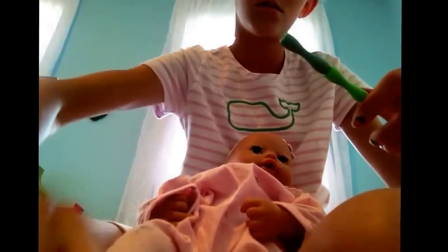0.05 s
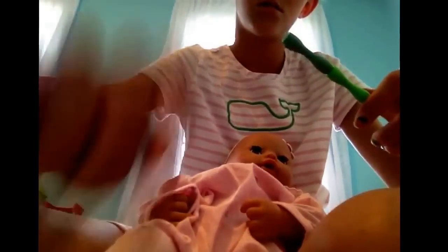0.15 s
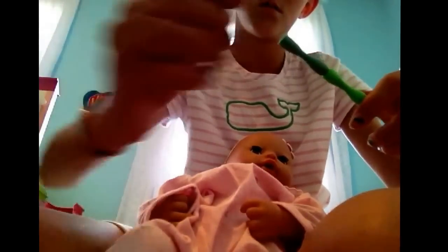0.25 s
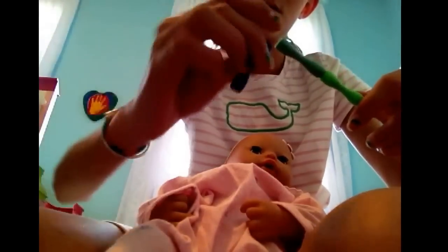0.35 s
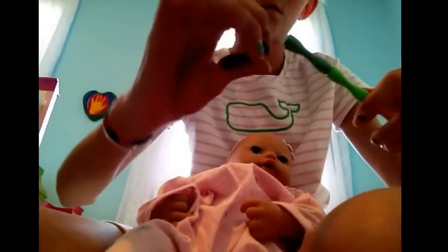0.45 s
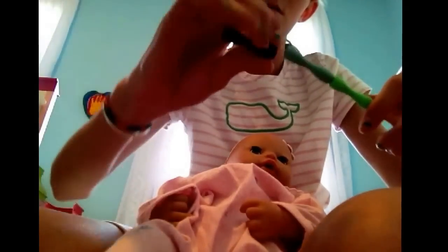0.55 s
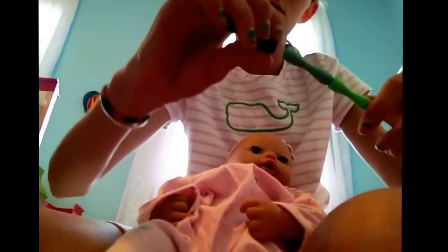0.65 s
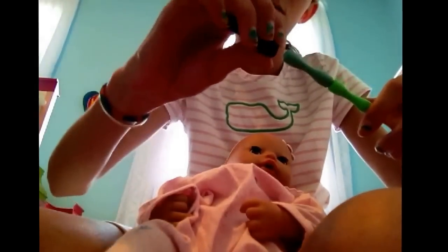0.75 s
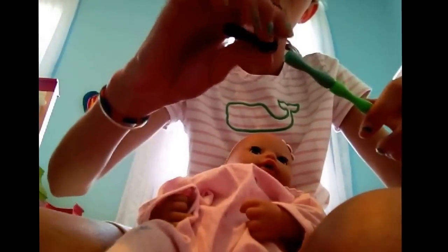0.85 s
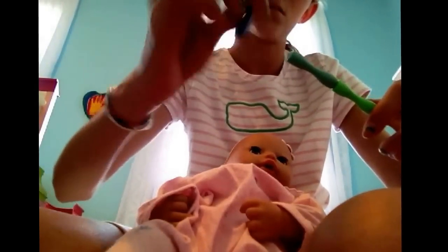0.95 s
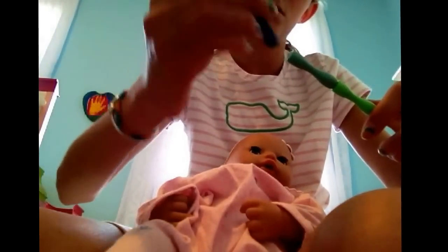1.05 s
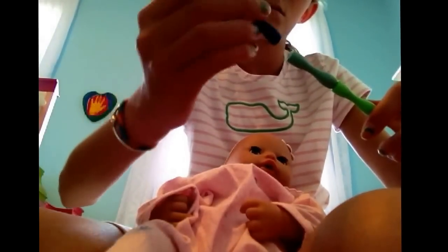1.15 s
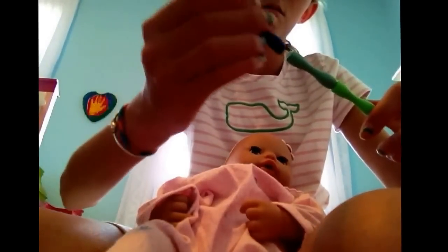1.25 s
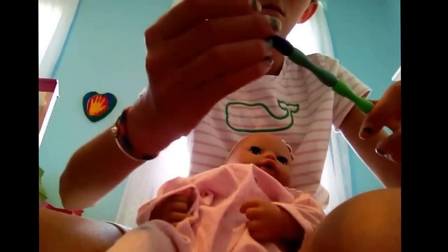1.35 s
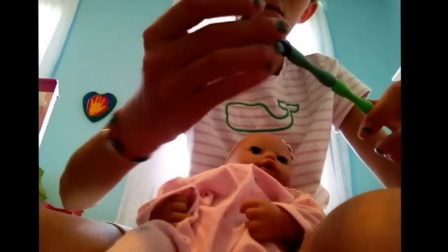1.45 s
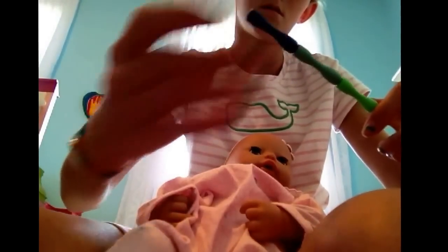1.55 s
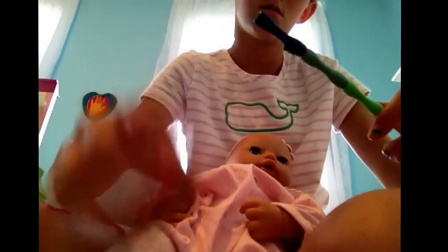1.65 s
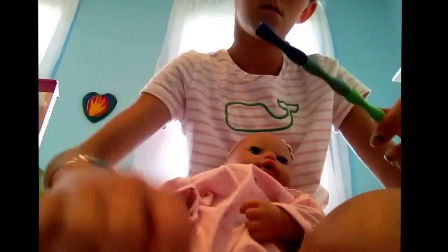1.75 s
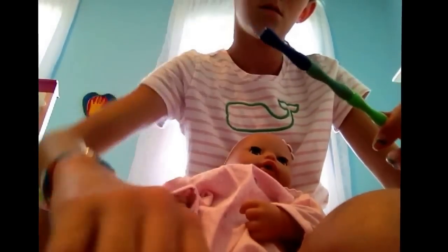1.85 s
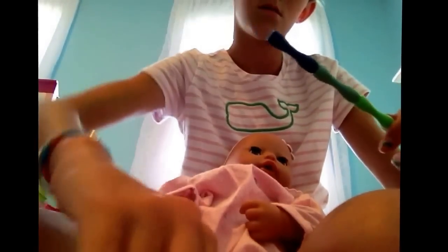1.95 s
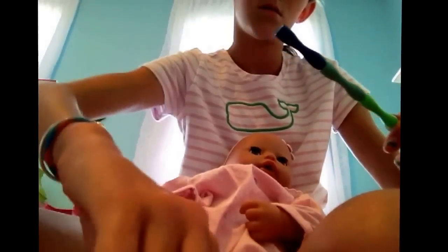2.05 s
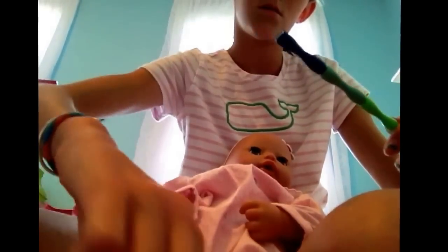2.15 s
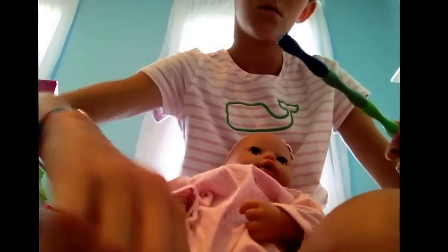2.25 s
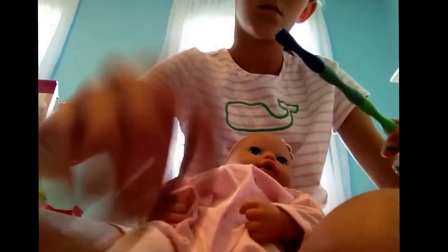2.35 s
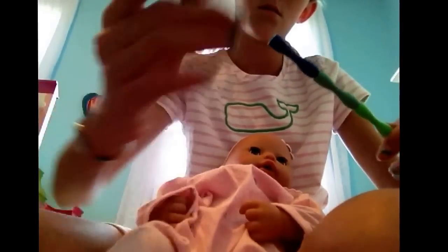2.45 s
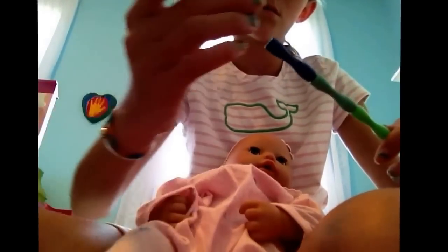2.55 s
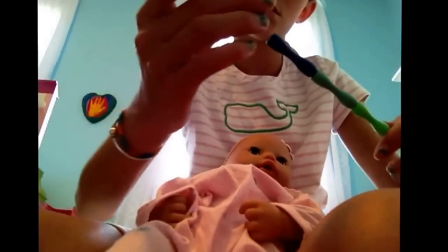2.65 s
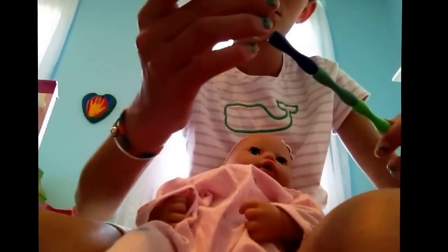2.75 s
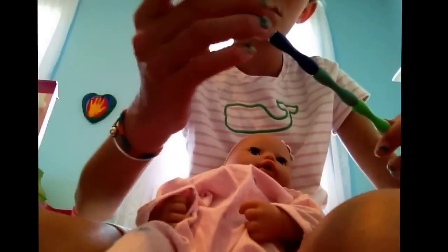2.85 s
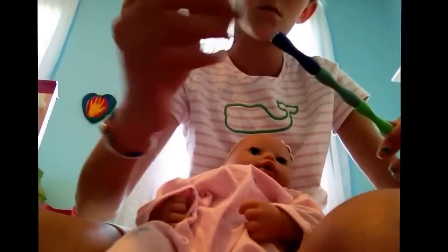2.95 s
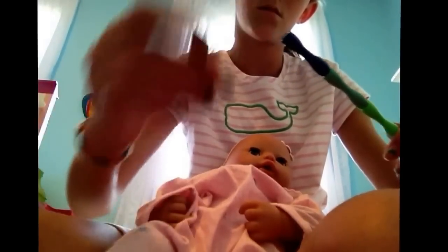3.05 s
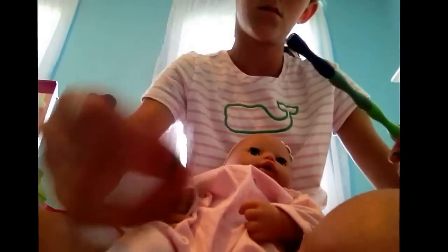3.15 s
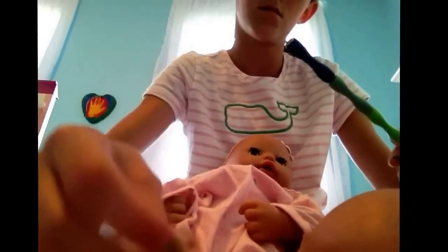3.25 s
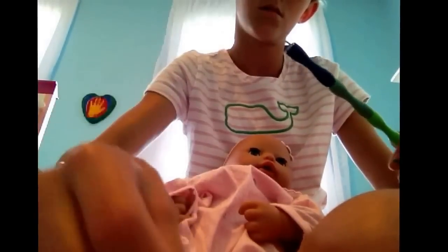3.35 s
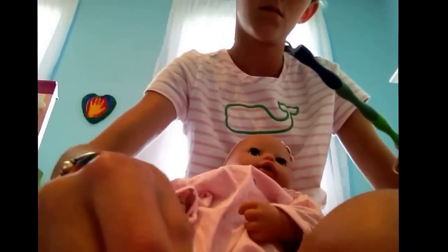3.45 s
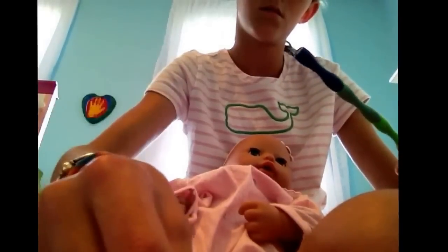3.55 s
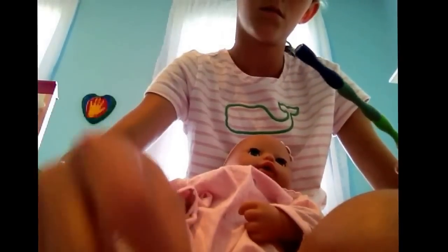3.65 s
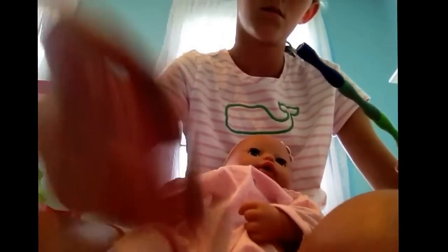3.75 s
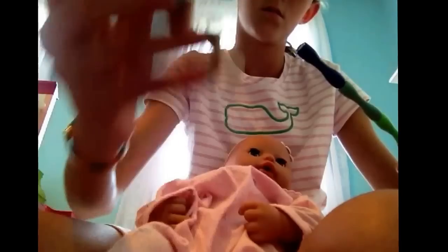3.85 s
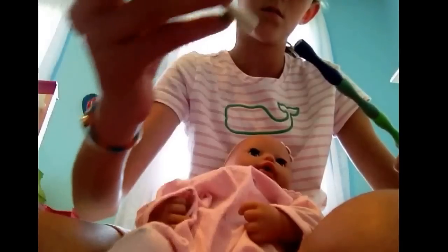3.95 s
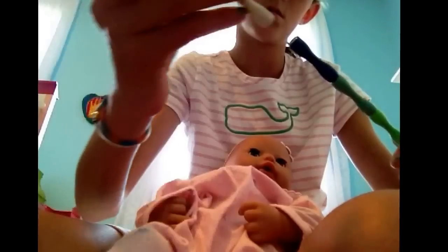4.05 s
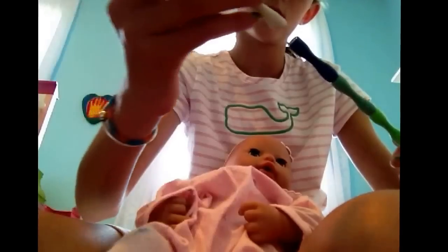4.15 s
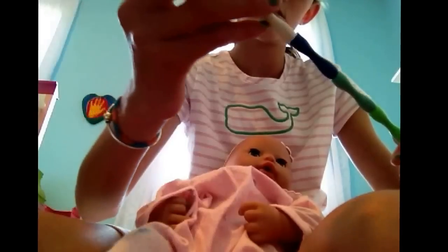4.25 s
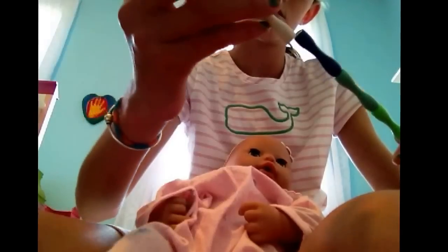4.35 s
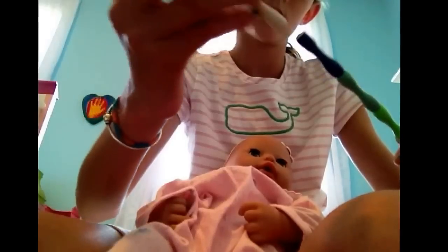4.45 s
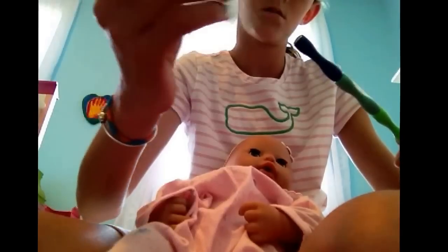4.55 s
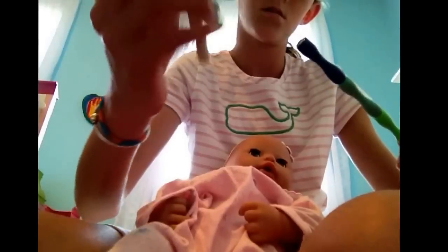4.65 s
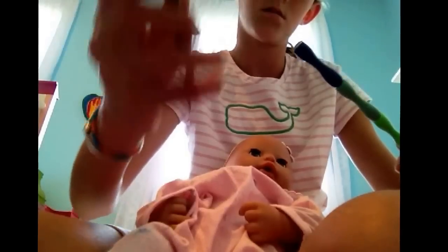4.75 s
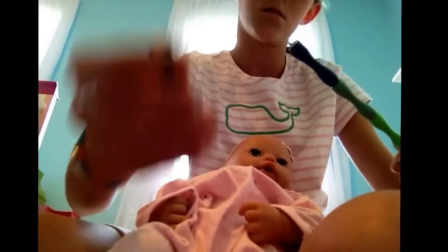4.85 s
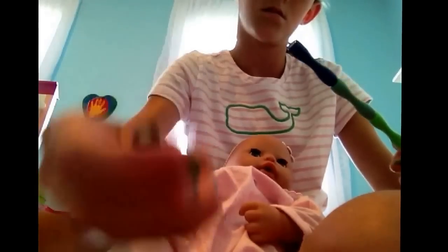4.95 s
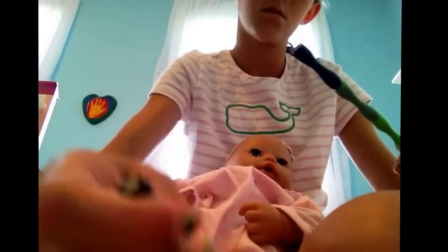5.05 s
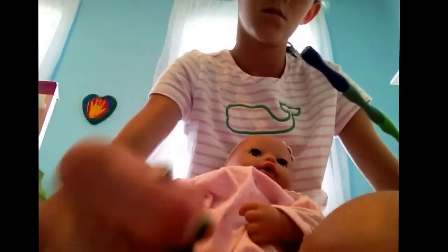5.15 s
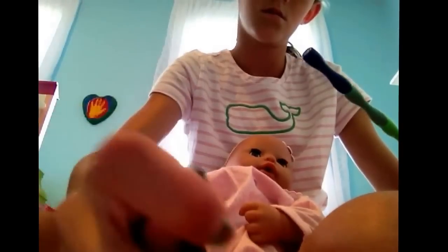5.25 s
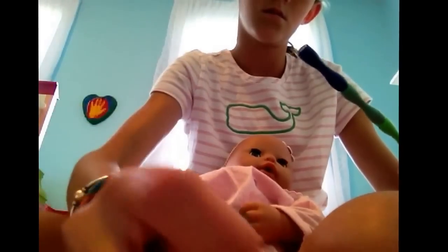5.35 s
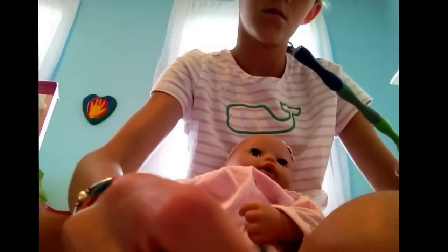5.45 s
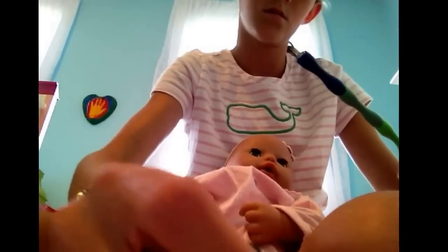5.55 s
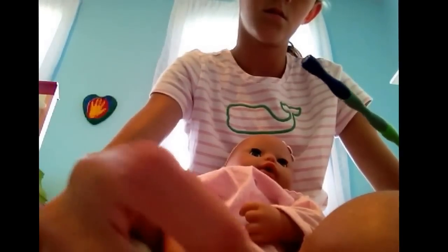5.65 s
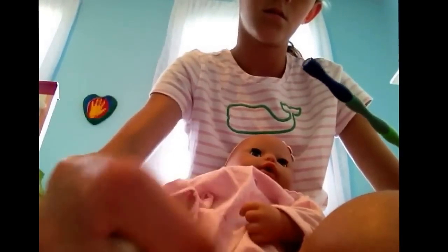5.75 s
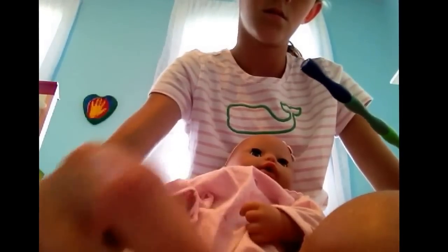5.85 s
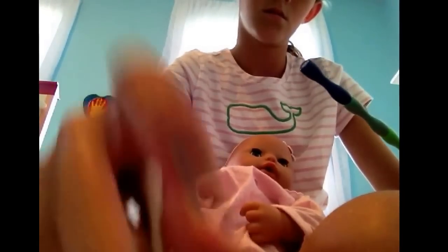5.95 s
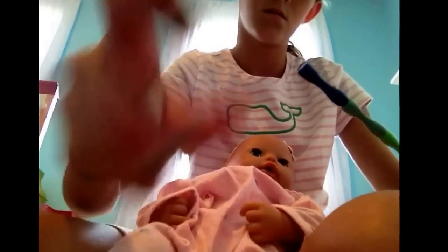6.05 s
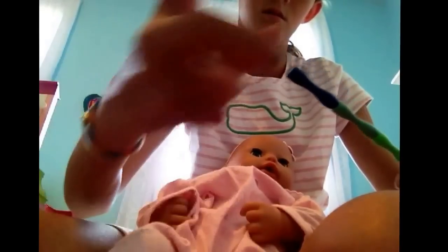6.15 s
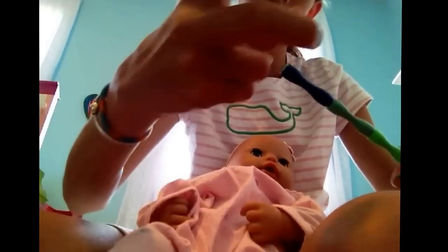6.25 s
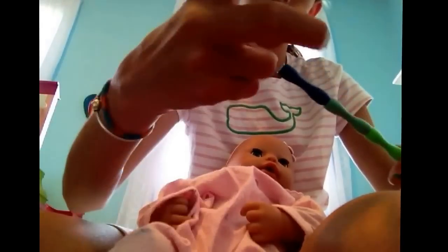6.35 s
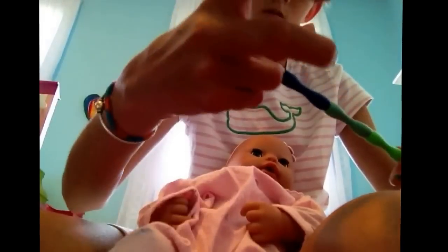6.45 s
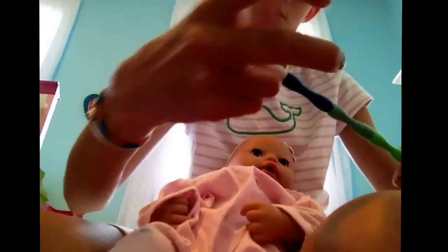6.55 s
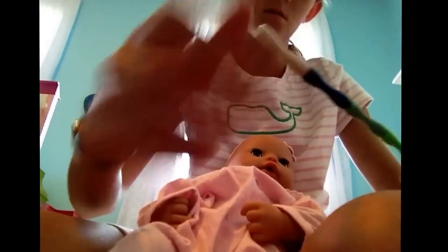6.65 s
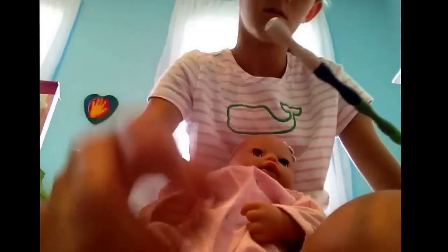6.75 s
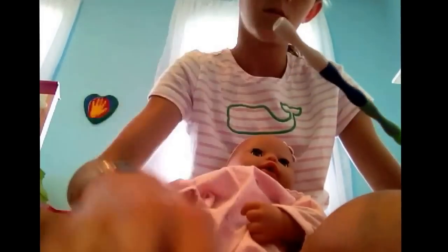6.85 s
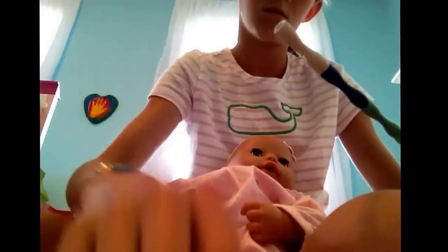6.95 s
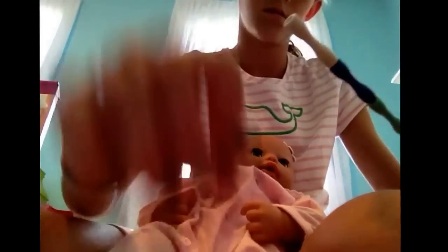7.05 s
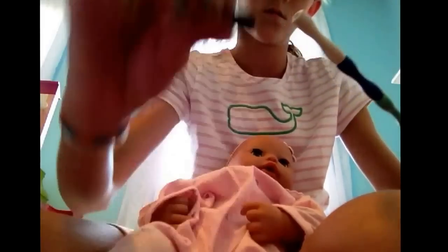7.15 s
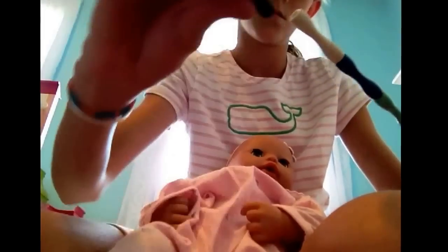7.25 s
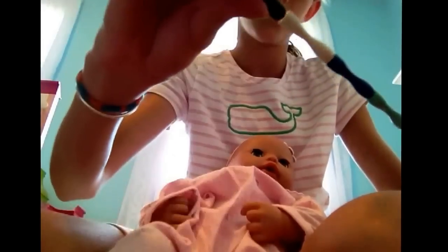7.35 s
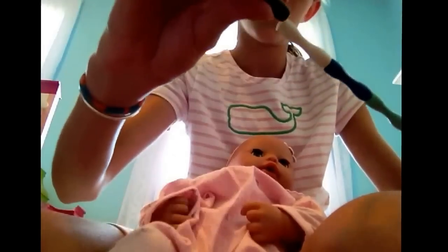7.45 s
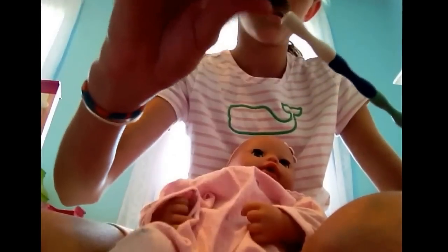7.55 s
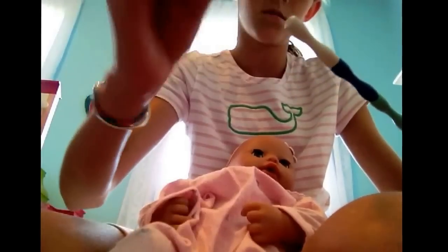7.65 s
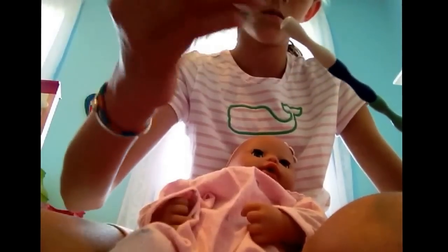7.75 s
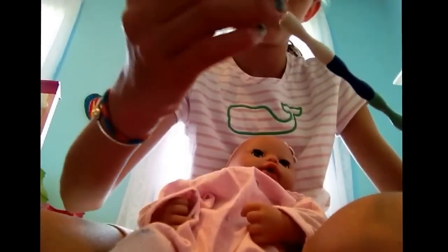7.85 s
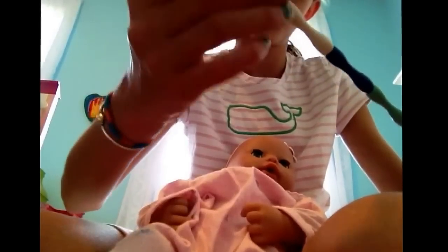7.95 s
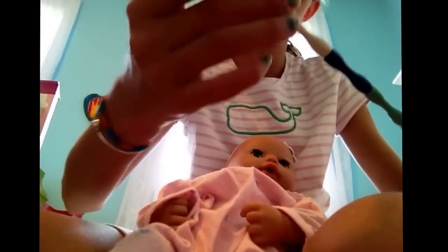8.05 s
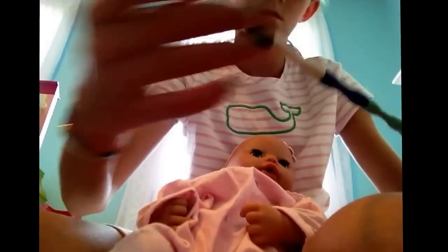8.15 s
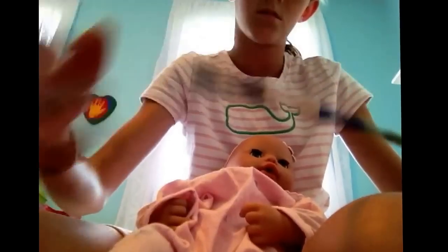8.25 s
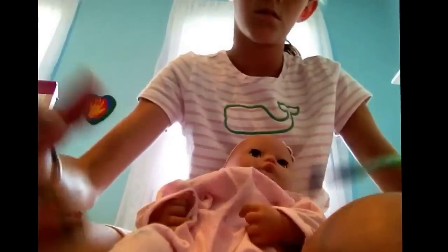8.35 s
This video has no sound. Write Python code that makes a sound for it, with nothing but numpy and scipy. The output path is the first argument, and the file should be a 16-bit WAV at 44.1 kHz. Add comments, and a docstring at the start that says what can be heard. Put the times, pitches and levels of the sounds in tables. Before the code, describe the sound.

Small magnetic rods snap together four times with crisp, high metallic clacks close by, over very faint fabric brushing, low room murmur and thin hiss.

```python
"""A small, quiet bedroom, close to the microphone: a hand brushes cloth, then clothes shift softly.
Magnetic toy rods snap together at 1.3, 3.4, 6.4 and 7.9 s: a touch, a rebound and a few milliseconds of chatter
drive a very high metal ring, a lower plastic rod and a hollow knock, then the room answers.
Between the snaps come more brushing and shifting, made of shaped noise; a loose rod pings faintly at 6.8 s.
Noise murmur and hiss run throughout, and all levels dip after a loud snap and creep back."""
import sys
import numpy as np
from scipy import signal
from scipy.fft import rfft, irfft
from scipy.io import wavfile
from scipy.ndimage import uniform_filter1d

SR = 44100
rng = np.random.default_rng(int(sys.argv[2]) if len(sys.argv) > 2 else 0)


def master(y):
    """Save y as 16-bit WAV."""
    cut = np.clip(np.atleast_2d(y).T, -1, 1)
    pcm = np.round(cut * 32767)  # scale
    wavfile.write(sys.argv[1], SR, pcm.astype(np.int16))


N = 370358

# magnets meeting: (time [s], crack [dB], metal ring [dB], rod clack [dB], rod ping [dB], hollow knock [dB],
#                   knock pitch [Hz], rebound delay [s], rebound [dB], chatter t60 [s], room [dB])
MAGNET_SNAPS = [(1.286, -1.5, 4.5, -21, -28, -20.5, 1895, .0021, -4, 0.012, -12.5),
                (3.4345, -4.7, 2.5, -3, -5.5, -18.5, 1789, .0012, -9.5, .016, -16),
                (6.4259, -3, 10, -18, -30, -23, 1410, .0016, -12, .017, -14.5),
                (7.9236, -4.5, -2.5, -17, -19, -22.5, 970, .0012, -1, 0.019, -13.5)]
# a loose rod tapped lightly: (time [s], ping [dB], crack [dB], metal ring [dB])
LOOSE_ROD_TAPS = [(6.845, -30, -42, -36)]
# ringing metal end of a rod: (frequency [Hz], level [dB], t60 [s])
METAL_MODES = [(12200, -15, .005), (12800, -2, .007), (13450, 0, .008), (14100, -2, .006),
               (14700, -7, .005)]
# quickly damped modes of the plastic rod: (frequency [Hz], level [dB], t60 [s])
ROD_MODES = [(2670, -3.5, 0.0022), (3400, -0.5, .007), (3800, -4, 0.0055), (4300, -3, 0.006),
             (4500, -6.5, 0.0098), (5050, -4.5, 0.014)]
# close modes that ring on when a rod is held loosely: (frequency [Hz], level [dB], t60 [s])
PING_MODES = [(4220, -1, .02), (4330, 0, .014), (4270, -12, .22)]
# spectrum of the bare contact: (frequency [Hz], level [dB per Hz])
CRACK_SPECTRUM = [(100, -33.5), (500, -19.5), (1200, -18.5), (3000, -9), (4800, -2), (5800, -5), (7000, 1),
                  (8400, 2.5), (10000, -2), (11500, -2.5), (13500, -2), (16000, -7)]
# spectrum of the hollow plastic shell: (multiple of the knock pitch [ratio], level [dB per Hz])
SHELL_SPECTRUM = [(.06, -42.5), (.25, -16), (.5, -11), (.8, -0.5), (1.3, -3), (2, -1), (3.2, -18.5),
                  (9, -35.5)]
BASS_CUT_HZ = 270

# strong reflections from floor, wall and ceiling: (delay [s], level against the diffuse tail [dB])
ROOM_ECHOES = [(.0039, -5), (.0143, -13.5), (.0168, -15.5), (.0259, -13.5)]
# reverberation time of the bedroom: (frequency [Hz], t60 [s])
ROOM_DECAY = [(300, .2), (1000, 0.12), (2500, .14), (4300, .17), (8000, 0.13), (13500, 0.155)]
# how much the walls and furniture send back: (frequency [Hz], level [dB])
ROOM_TONE = [(300, 0.5), (1000, 2), (2500, -3), (4300, -1), (8000, 1.5), (13500, -1.5)]

# a hand brushes along cloth and comes to rest:
# (time of the touch [s], lead-in [s], rustle [dB], touch [dB])
HAND_REACHES = [(.065, 0.034, -66.5, -76), (1.885, 0.092, -68.5, -76), (2.0, 0.032, -66.5, -76),
                (5.905, .055, -64.5, -62.5), (6.932, 0.069, -64.5, -60)]
RUB_RELEASE_S, TOUCH_HALF_WIDTH_S, TOUCH_HZ = .015, .009, 290
# arms and knees shift softly: (time of the peak [s], half width [s], level [dB], centre [Hz])
LIMB_SHIFTS = [(.75, 0.051, -61.5, 273), (2.53, .019, -76, 60), (3.08, .014, -64.5, 180),
               (5.74, .018, -73, 75), (7.485, 0.055, -60.5, 175)]
SLEEVE_DB = -19   # sleeve rustle, relative to the shift that drags it
# spectrum of rustling cloth: (frequency [Hz], level [dB per Hz])
RUSTLE_SPECTRUM = [(150, -31), (400, 1.5), (800, 3), (1600, -0.5), (2600, -8.5), (5000, -11), (9000, -23),
                   (14000, -20.5), (16000, -28)]

# spectrum of the low room murmur: (frequency [Hz], level [dB per Hz])
MURMUR_SPECTRUM = [(15, -49.5), (30, -32.5), (55, -26.5), (80, -19), (115, -3), (170, 0.5), (210, -3),
                   (280, -2.5), (410, -12), (510, -9.5), (650, -17), (900, -22), (1300, -45)]
# spectrum of the microphone hiss: (frequency [Hz], level [dB per Hz])
HISS_SPECTRUM = [(410, -33.5), (700, -2), (907, -6), (993, -3), (1290, -5), (1430, -5.5), (3440, -8),
                 (10200, -16.5), (14600, -13.5), (15400, -10)]
MURMUR_DB, HISS_DB = -68.5, -72.4   # rms, ahead of the recorder

# the recorder turns down above this level and creeps back
LIMIT_DB, RECOVERY_DB_PER_S = -19, 1.54
TOP_CUT_HZ = 15300


def snaps():
    """Each contact cracks, rings the metal end and the rod, and knocks the hollow shell."""
    t = np.arange(SR // 3) / SR
    out = np.zeros(N + len(t))
    for (s, crack_db, metal_db, rod_db, ping_db, knock_db, knock_hz,
         rebound_s, rebound_db, chatter_t60, room_db) in MAGNET_SNAPS:
        # the blow arrives directly, then again by way of the walls
        direct = contact(t, rebound_s, rebound_db, chatter_t60)
        arrivals = direct + from_db(room_db) * bedroom(t)
        shell = [(multiple * knock_hz, db) for multiple, db in SHELL_SPECTRUM]

        crack = from_db(crack_db) * unit_energy(colour(arrivals, CRACK_SPECTRUM))
        metal = from_db(metal_db) * ring(arrivals, METAL_MODES)
        rod = from_db(rod_db) * ring(arrivals, ROD_MODES)
        ping = from_db(ping_db) * ring(arrivals, PING_MODES)
        knock = from_db(knock_db) * unit_energy(colour(arrivals, shell))
        start = round(s * SR)
        out[start:start + len(t)] += crack + metal + rod + ping + knock
    # such small parts radiate almost no bass
    bass_cut = signal.butter(2, BASS_CUT_HZ, "high", fs=SR, output="sos")
    return signal.sosfilt(bass_cut, out[:N])


def contact(t, rebound_s, rebound_db, chatter_t60, chatter_db=2.5, seating_s=0.0022):
    """First touch, one rebound, and a fine chatter that dies once the faces have seated."""
    fade = from_db(-60 * np.maximum(t - seating_s, 0) / chatter_t60)
    chatter = rng.standard_normal(len(t)) * fade
    force = from_db(chatter_db) * unit_energy(chatter)
    force[0] += 1
    force[round(rebound_s * SR)] += from_db(rebound_db)
    return evened(force)


def evened(force, size=4096, smooth_hz=700):
    """Level out the broad humps and holes of the random chatter, so that each snap keeps its set colour."""
    hz = np.fft.rfftfreq(size, 1 / SR)
    power = uniform_filter1d(np.abs(rfft(force, size)) ** 2, round(smooth_hz / hz[1]))
    inverse_db = -10 * np.log10(power + 1e-12)
    return unit_energy(colour(force, np.column_stack([hz, inverse_db])[1:]))


def ring(force, modes):
    """Decaying modes driven by a force; each takes its own share of the energy."""
    t = np.arange(len(force)) / SR
    out = 0
    for hz, db, t60 in modes:
        mode = np.cos(2 * np.pi * hz * t) * from_db(-60 * t / t60)
        mode[0] /= 2   # the step at the onset counts half, which keeps the skirts of the mode low
        driven = signal.fftconvolve(force, mode)[:len(t)]
        out = out + from_db(db) * unit_energy(driven)
    return unit_energy(out)


def taps(room_db=-16):
    """A single light touch with no rebound: a small clear ping."""
    t = np.arange(SR // 3) / SR
    out = np.zeros(N + len(t))
    for s, ping_db, crack_db, metal_db in LOOSE_ROD_TAPS:
        arrivals = (t == 0) + from_db(room_db) * bedroom(t)
        ping = from_db(ping_db) * ring(arrivals, PING_MODES)
        crack = from_db(crack_db) * unit_energy(colour(arrivals, CRACK_SPECTRUM))
        metal = from_db(metal_db) * ring(arrivals, METAL_MODES)
        start = round(s * SR)
        out[start:start + len(t)] += ping + crack + metal
    return out[:N]


def bedroom(t, build_s=.014, early_db=-7):
    """Room response: a few distinct echoes and a diffuse tail that fills in once the walls answer."""
    hz = np.fft.rfftfreq(len(t), 1 / SR)
    white = rfft(rng.standard_normal(len(t)))
    edges = np.geomspace(100, 18000, 12)
    tail = 0
    for low, high in zip(edges, edges[1:]):
        band = irfft(white * ((hz >= low) & (hz < high)), len(t))
        t60 = at_hz(ROOM_DECAY, np.sqrt(low * high))
        tail = tail + band * from_db(-60 * t / t60)
    response = unit_energy(tail * np.where(t < build_s, from_db(early_db), 1))
    for delay_s, db in ROOM_ECHOES:
        response[round(delay_s * SR)] += from_db(db)
    return colour(response, ROOM_TONE)


def handling(t, grain_db=2.5, grain_s=0.0052):
    """Friction builds in uneven grains until the hand lands with a soft bump; limbs drag a sleeve along."""
    friction = touches = limbs = 0
    for s, lead_s, rustle_db, touch_db in HAND_REACHES:
        # exponential rise up to the touch, exponential fall after it
        rub = np.exp(-np.maximum((s - t) / lead_s, (t - s) / RUB_RELEASE_S))
        friction = friction + from_db(rustle_db) * rub
        touches = touches + from_db(touch_db) * swell(t, s, TOUCH_HALF_WIDTH_S)
    for s, half_width, db, hz in LIMB_SHIFTS:
        motion = from_db(db) * swell(t, s, half_width)
        friction = friction + from_db(SLEEVE_DB) * motion
        limbs = limbs + motion * soft_thud(hz)

    grain = uniform_filter1d(rng.standard_normal(N), round(grain_s * SR))
    unevenness = from_db(grain_db * grain / np.std(grain))
    rustle = friction * unevenness * noise(RUSTLE_SPECTRUM)
    return rustle + touches * soft_thud(TOUCH_HZ) + limbs


def soft_thud(hz, octave_db=-14, skirt_db=-55):
    """Steady noise with one broad hump around a centre, the raw tone of a padded bump."""
    return noise([(hz / 8, skirt_db), (hz / 2, octave_db), (hz, 0),
                  (hz * 2, octave_db), (hz * 10, skirt_db), (SR / 2, 2 * skirt_db)])


def swell(t, s, half_width):
    """A smooth (Gaussian) rise and fall of amplitude around a moment."""
    return np.exp(-.5 * ((t - s) / half_width) ** 2)


def background():
    """Low room murmur under a thin hiss, both steady shaped noise."""
    murmur = from_db(MURMUR_DB) * noise(MURMUR_SPECTRUM)
    hiss = from_db(HISS_DB) * noise(HISS_SPECTRUM)
    return murmur + hiss


def noise(spectrum):
    """Steady noise of rms 1 with the given spectrum."""
    gain = from_db(at_hz(spectrum, np.fft.rfftfreq(N, 1 / SR)))
    shaped = irfft(rfft(rng.standard_normal(N)) * gain, N)
    return shaped / np.std(shaped)


def colour(x, spectrum, size=4096):
    """Causal (minimum-phase) filter with the given spectrum."""
    gain = from_db(at_hz(spectrum, np.fft.rfftfreq(size, 1 / SR)))
    cepstrum = irfft(np.log(gain))
    # fold the cepstrum onto positive time
    cepstrum[1:size // 2] *= 2
    cepstrum[size // 2 + 1:] = 0
    response = irfft(np.exp(rfft(cepstrum)))
    return signal.fftconvolve(x, response)[:len(x)]


def at_hz(points, hz):
    """Read a table along a logarithmic frequency axis."""
    table_hz, values = np.transpose(points)
    return np.interp(np.log(np.maximum(hz, 1)), np.log(table_hz), values)


def unit_energy(x):
    """Scale a short sound so that its squares sum to one."""
    return x / np.sqrt(np.sum(x ** 2) + 1e-20)


def from_db(db):
    """Turn decibels into an amplitude factor."""
    return 10 ** (np.asarray(db) / 20)


def gain_control(x, window_s=0.0099):
    """A snap above the limit pulls the gain down at once; it recovers at a steady rate."""
    power = uniform_filter1d(x ** 2, round(window_s * SR))
    level_db = 10 * np.log10(np.abs(power) + 1e-12)
    excess_db = np.maximum(level_db - LIMIT_DB, 0)
    # a running maximum on a rising ramp holds each cut and lets it shrink at the recovery rate
    recovered_db = RECOVERY_DB_PER_S * np.arange(N) / SR
    cut_db = np.maximum.accumulate(excess_db + recovered_db, axis=-1) - recovered_db
    return x * from_db(-cut_db)


def scene():
    """Snaps, taps, handling and background in one channel."""
    t = np.arange(N) / SR
    return (snaps() + taps() + handling(t) + background())[None, :]


def record(dry):
    """The recorder ducks whatever exceeds its limit and cuts the top steeply."""
    top_cut = signal.ellip(12, .1, 70, TOP_CUT_HZ, fs=SR, output="sos")
    return signal.sosfilt(top_cut, gain_control(dry))


dry = scene()
out = record(dry)
master(out)
```